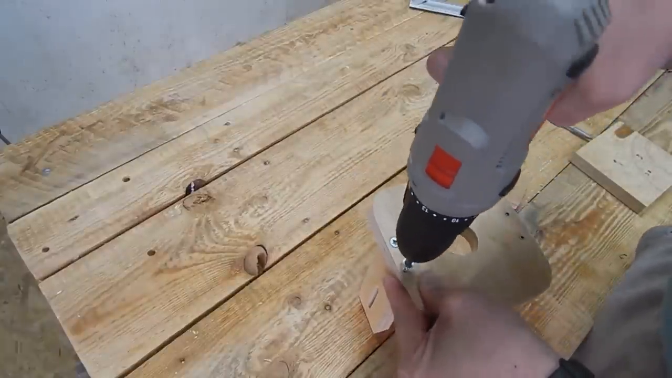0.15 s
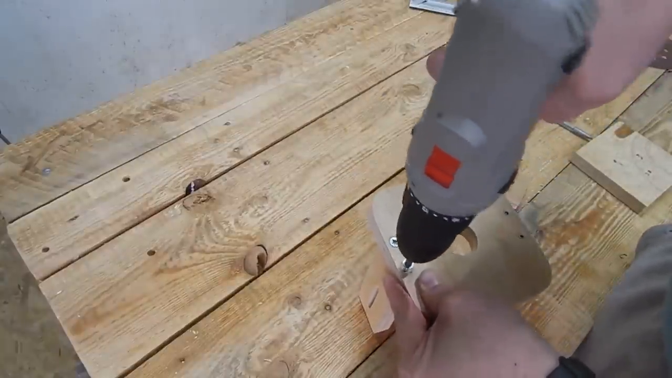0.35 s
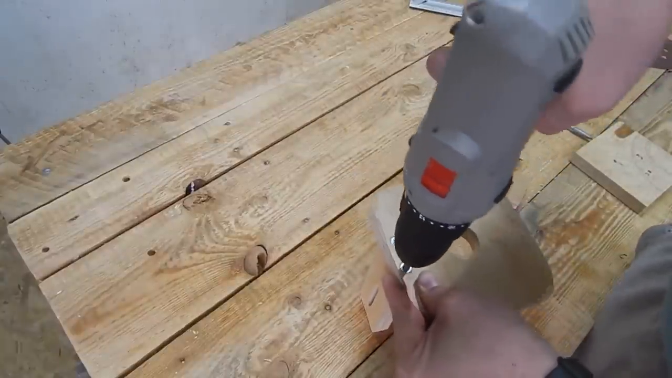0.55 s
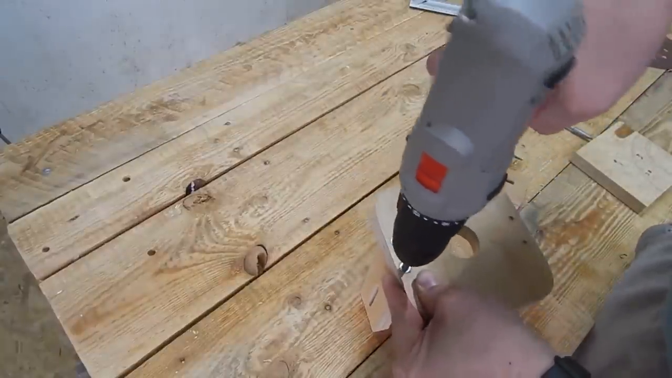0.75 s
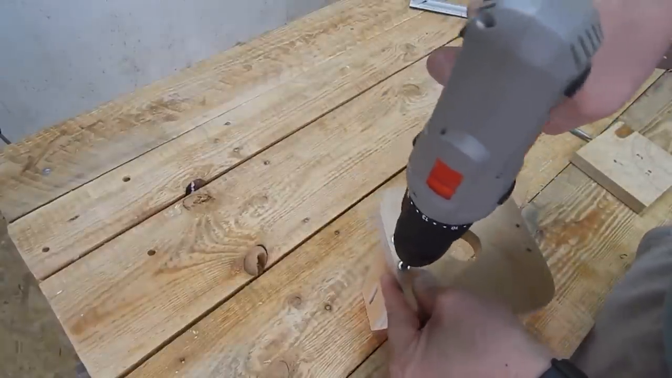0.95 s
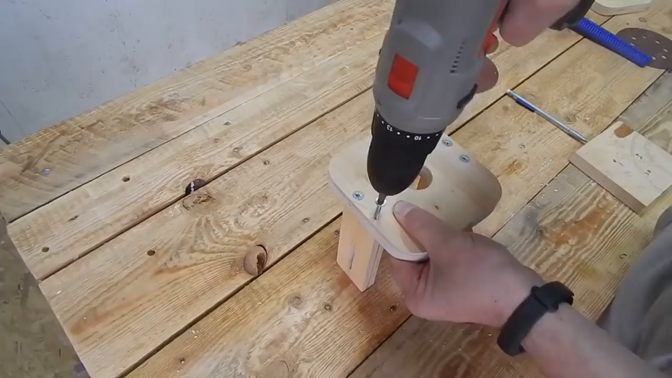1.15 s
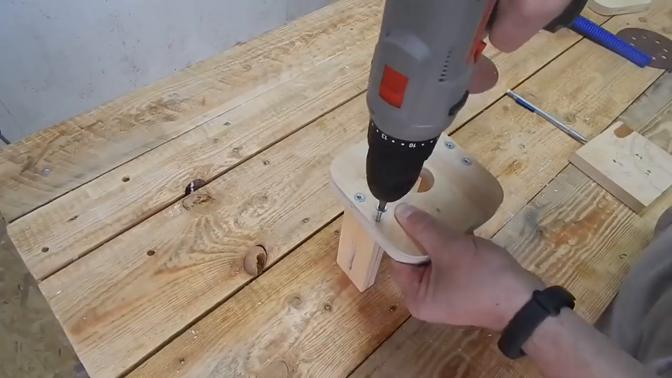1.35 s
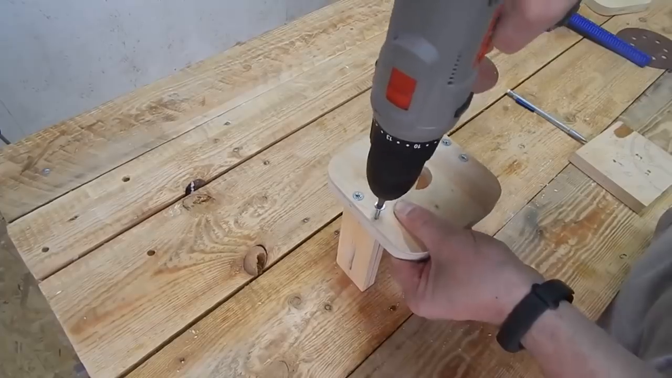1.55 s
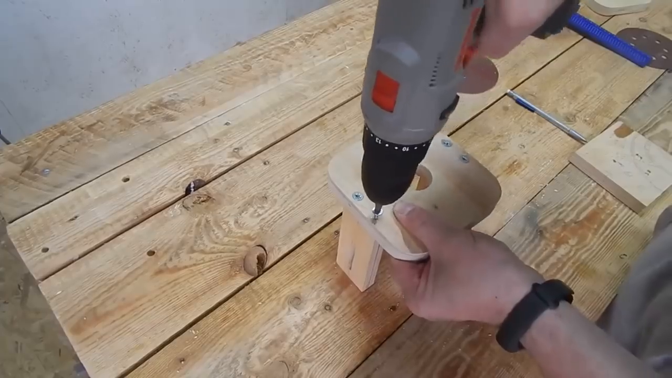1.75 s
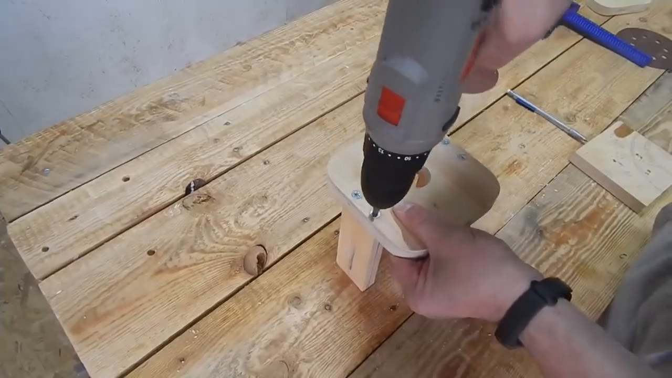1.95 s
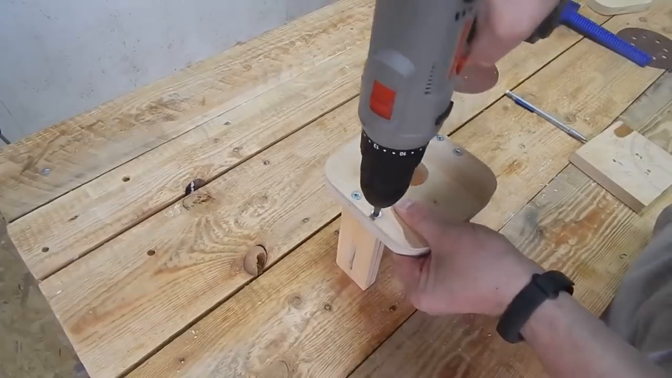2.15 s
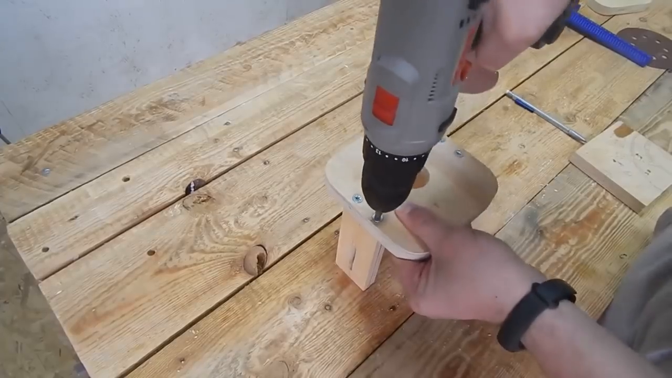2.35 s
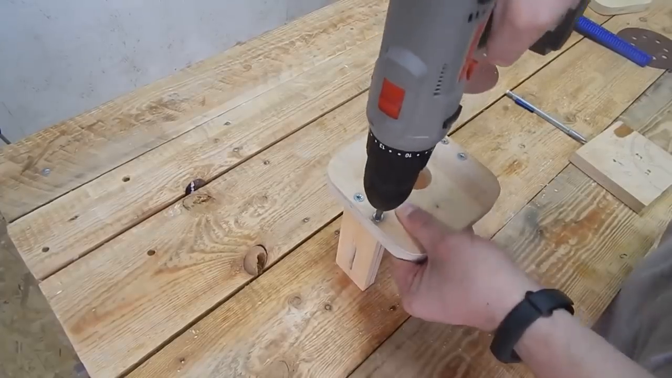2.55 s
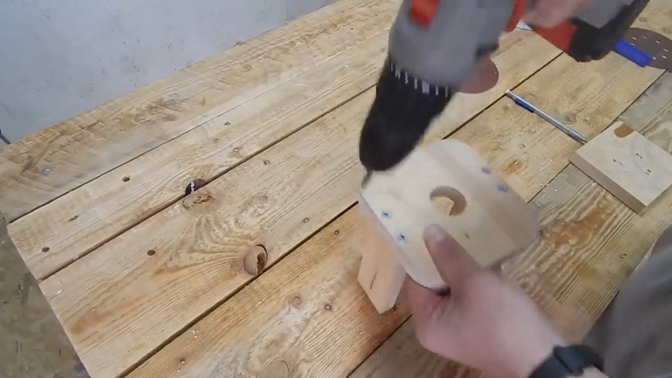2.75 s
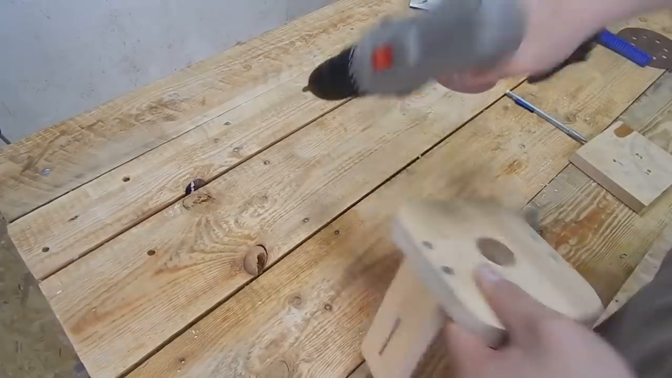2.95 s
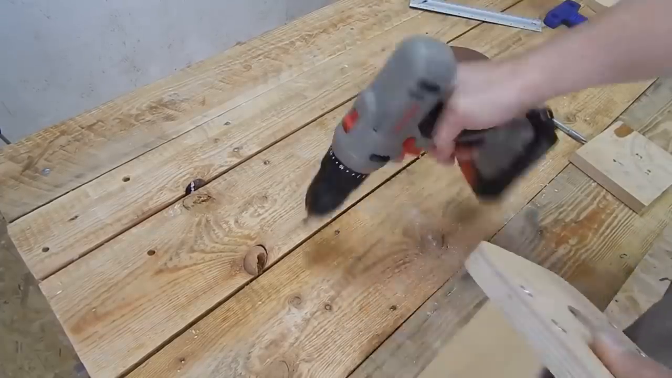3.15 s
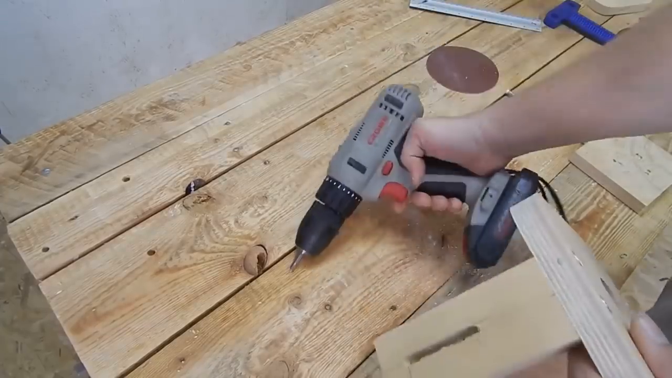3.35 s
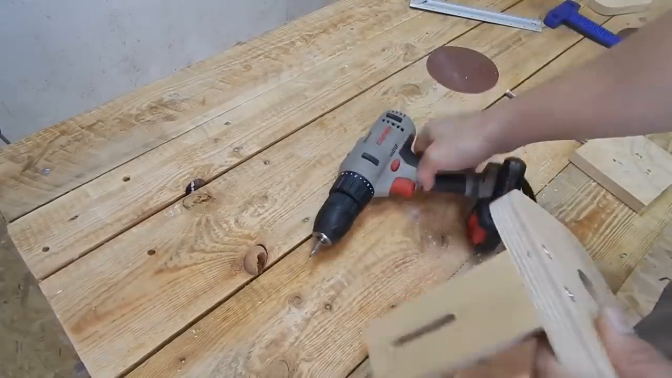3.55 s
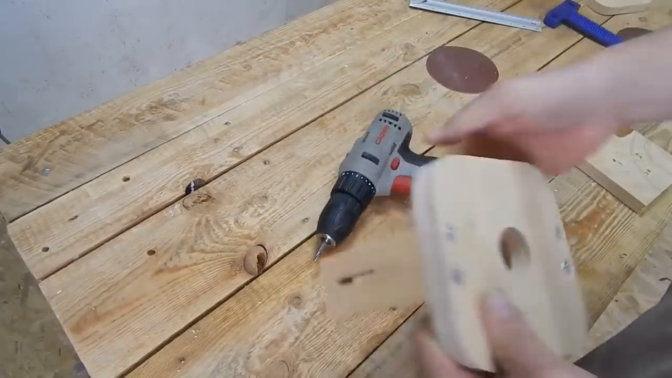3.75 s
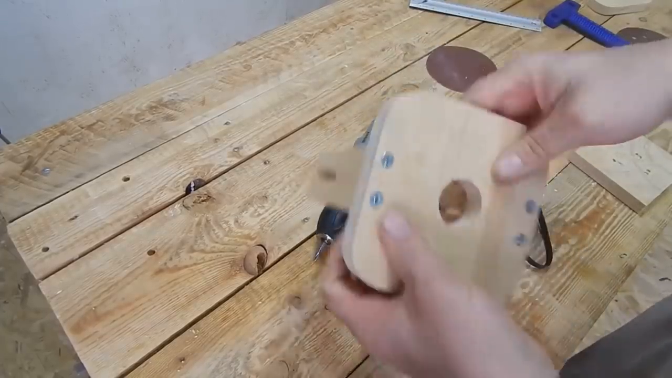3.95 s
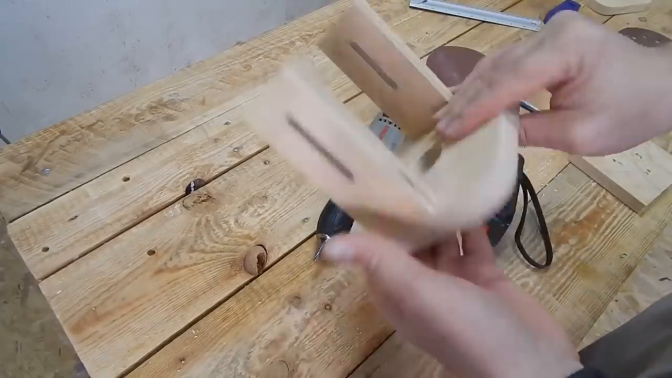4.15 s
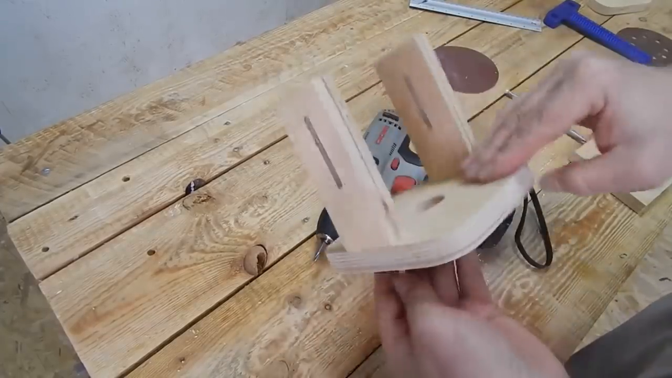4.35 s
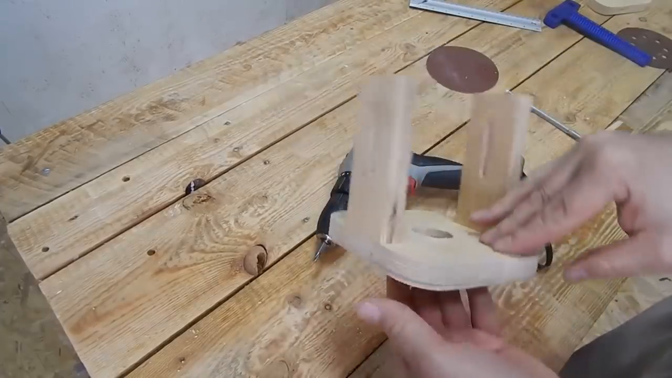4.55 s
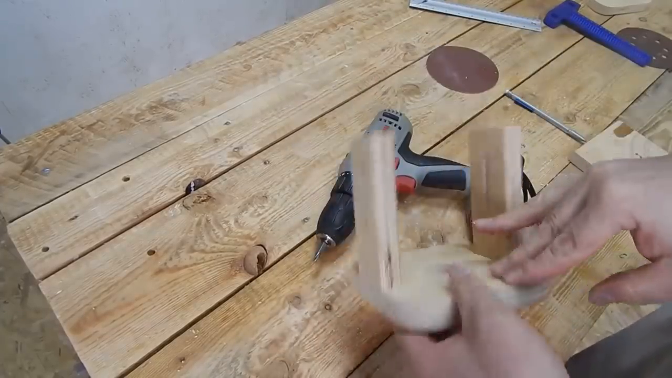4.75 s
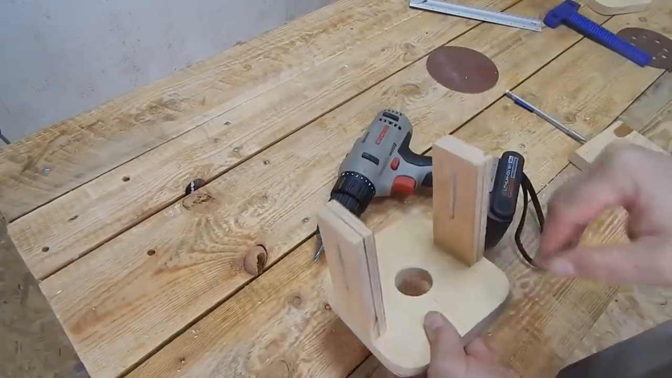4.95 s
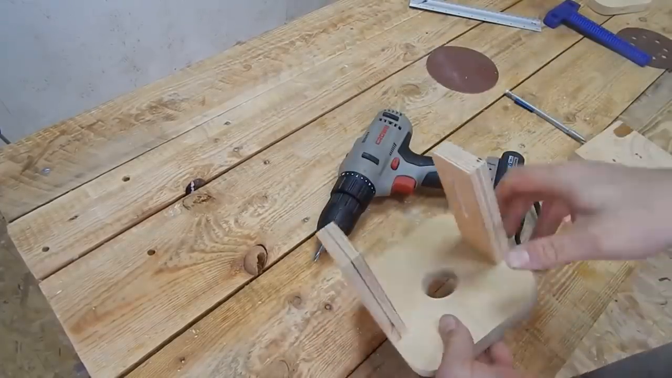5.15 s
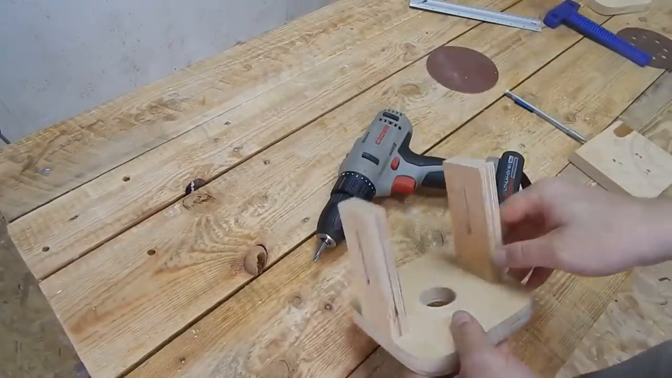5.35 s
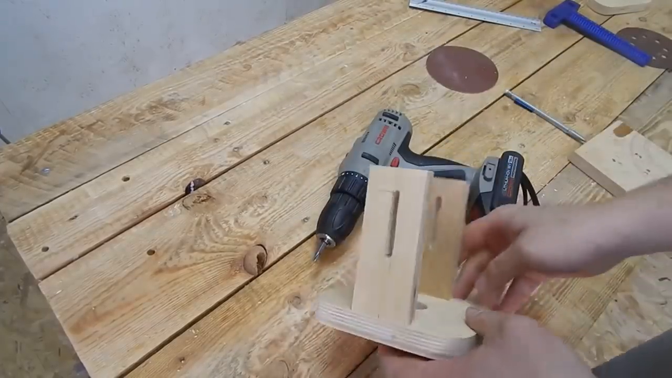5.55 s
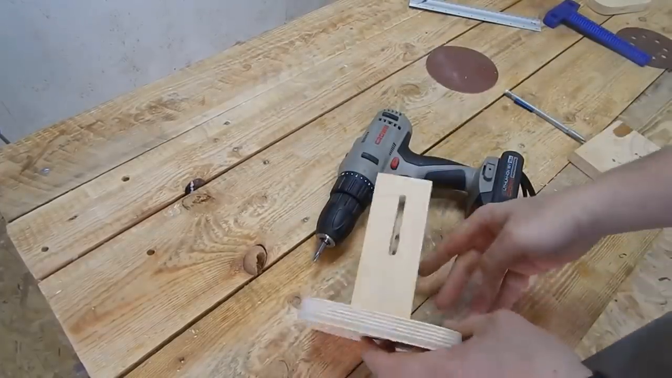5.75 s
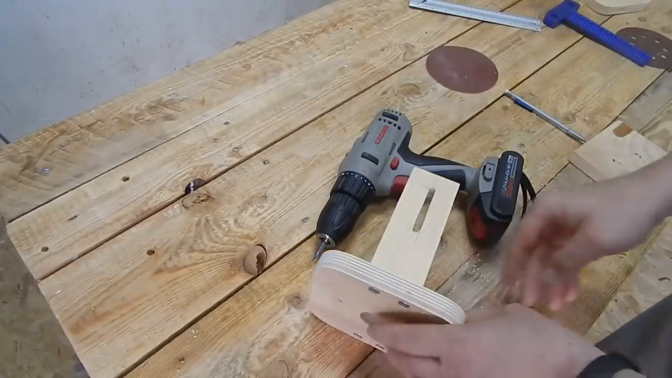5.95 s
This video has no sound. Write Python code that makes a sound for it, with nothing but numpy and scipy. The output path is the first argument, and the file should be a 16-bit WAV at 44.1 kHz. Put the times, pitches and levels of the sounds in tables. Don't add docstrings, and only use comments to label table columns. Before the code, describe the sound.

A cordless drill whines in four trigger squeezes, twice slipping into a racing buzz, then clatters onto a plank bench before hands rub and tap wood.

```python
import sys
import numpy as np
from scipy import signal
from scipy.fft import rfft, irfft
from scipy.io import wavfile
from scipy.ndimage import uniform_filter1d

SR = 44100
rng = np.random.default_rng(int(sys.argv[2]) if len(sys.argv) > 2 else 0)


def wrap_up_sound(samples):
    columns = np.atleast_2d(samples).T
    tamed = np.clip(columns, -1, 1)
    steps = np.round(tamed * 32767).astype(np.int16)
    wavfile.write(sys.argv[1], SR, steps)


def volts_from_decibels(level):
    exponent = np.asarray(level, float) / 20
    return 10 ** exponent


N = 265041

# (time [s], gear whine [Hz], motor effort [dB])
SQUEEZES = [
    [(0.0, 401.2, -52), (0.06, 491.1, -24), (0.116, 702.6, -20), (0.15, 785.5, -27.5), (0.186, 846.5, -21),
     (0.22, 869, -31), (0.25, 599, -44.5), (0.3, 392.3, -57)],
    [(0.37, 400.5, -45.5), (0.422, 467.7, -23.5), (0.455, 633.5, -24), (0.492, 767.4, -24),
     (0.552, 849.2, -22.5), (0.63, 860.4, -21), (0.665, 866.5, -33)],
    [(1.215, 425.8, -24.5), (1.272, 544.3, -24), (1.325, 789.5, -20), (1.351, 832.3, -28), (1.39, 700, -23),
     (1.425, 532.2, -24.5), (1.48, 400.6, -53.5), (1.52, 402.6, -49.5)],
    [(1.572, 402.5, -45.5), (1.624, 507.7, -22), (1.686, 795.2, -22.5), (1.724, 844.6, -26.5),
     (1.794, 900, -22.5), (1.984, 888.6, -20.5), (2.035, 879.5, -20.5), (2.05, 877, -37)],
]
# (time [s], shaft [Hz], motor effort [dB], bit pressure on the work [dB])
SLIPS = [
    [(0.66, 307.6, -31, -24.5), (0.705, 322.5, -32.5, -20), (0.77, 340.1, -31, -25),
     (0.866, 347.9, -30, -18), (0.92, 349.7, -32, -21.5), (0.962, 344.3, -34.5, -19.5),
     (0.98, 319.5, -37.5, -28.5), (1.03, 251.1, -64, -61)],
    [(2.05, 314.7, -33.5, -24), (2.088, 339.2, -28, -22.5), (2.15, 343.6, -31, -21),
     (2.185, 349.1, -32, -20.5), (2.226, 350.7, -27.5, -22), (2.33, 350, -29, -17.5),
     (2.352, 347, -33, -18), (2.375, 273.7, -36, -31.5), (2.42, 217.6, -58.5, -55)],
]
# (multiple of the whine [1], level [dB], roughness [0-1])
LOADED_ORDERS = [(1 / 3, 0.83, 0.19), (1 / 2, -2.2, 0.6), (2.01, -0.13, 0.44), (2.7, -7, 0.17),
                 (3.76, 1.3, 0.15), (3.2, -15, 0.4), (5.9, -8, 1)]
# (multiple of the shaft [1], level [dB], roughness [0-1])
FREE_ORDERS = [(1 / 2, -25.5, .1), (3 / 2, -11, 0.13), (5 / 2, -11, 0.066), (3, -13.5, .1),
               (7 / 2, -18.5, 0.22), (4, -17.5, 0.4), (9 / 2, -20, .15), (11 / 2, -13, .1),
               (13 / 2, -16, 0.1), (15 / 2, -21, .15), (8, -18, 0.17)]
# (frequency [Hz], density [dB per Hz])
HISS = [(1760, -6.5), (3000, 2.5), (3260, -30), (3720, 1), (5860, 1.5), (8180, -8), (12900, -10),
        (15100, -9.5), (15900, -26)]
# (frequency [Hz], width [Hz], level [dB])
GRIND = [(1190, 250, -10.5), (1473, 230, -2), (1927, 340, 4), (2250, 550, 3), (2598, 160, 5),
         (3336, 320, -2.5)]
# (frequency [Hz], width [Hz], level [dB])
RUMBLE = [(115, 22, -11.5), (152.5, 11, -1), (212, 9.7, -3), (322, 23, 6.5), (468, 28.5, 7),
          (562, 26, -2.5), (671, 58, 1.5), (880, 240, -4.5)]
# (frequency [Hz], width [Hz], level [dB])
BENCH = [(99, 67, -7), (112, 57, 1), (235, 35.5, -0.5), (311.3, 110, 5), (355, 120, 7.5), (441.5, 27, -5.5),
         (522.5, 65, -0.5), (633.3, 27, 4), (787, 59, 3), (1140, 215, 7.5), (1230, 410, 1.5),
         (1930, 170, -17.5)]
# (frequency [Hz], width [Hz], level [dB])
PLYWOOD = [(720, 45, 14.5), (780, 23, -4.5), (1043, 79, -0.5), (1256, 150, -1.5)]
# (time [s], peak [dB], contact [ms], struck plank [Hz])
BIT_JOLTS = [(0.229, -9.5, 0.098, 336), (0.279, -13.5, 0.47, 686), (0.658, -7, 0.19, 594.3),
             (0.966, -23.5, 0.17, 667), (1.555, -19.5, 0.69, 112.3), (0.331, -23.5, 0.79, 113),
             (2.048, -17, 0.62, 95), (2.041, -1, 0.22, 202), (2.055, 1, 0.074, 530),
             (2.076, -22, 0.12, 350), (2.358, -16, 0.13, 676)]
# (time [s], peak [dB], contact [ms], struck plank [Hz])
DRILL_DOWN = [(3.411, -10, 0.33, 163), (3.417, -16, 0.63, 90), (3.542, -7.5, 0.65, 96.5),
              (3.424, -10, 0.27, 390), (3.448, -10.5, 0.15, 224), (3.481, 0, 0.41, 325),
              (3.49, -18, 0.21, 244), (3.513, -12, 0.21, 352), (3.538, 4.5, 0.36, 284),
              (3.551, -1.5, 0.16, 270), (3.564, 2.5, 0.23, 315), (3.584, -2, 0.12, 267),
              (3.603, 1, 0.07, 443), (3.625, -4.5, 0.2, 448), (3.637, -3, 0.086, 300),
              (3.896, -25.5, 0.53, 130), (3.944, -24, 0.8, 338), (3.973, -26, 0.69, 355)]
# (time [s], peak [dB], contact [ms], struck plank [Hz])
PART_TAPS = [(2.745, -36.5, 0.46, 216), (2.765, -34, 0.12, 368), (2.826, -12, 0.15, 406),
             (2.836, -13, 0.11, 605), (5.813, -6.5, 0.27, 310), (5.8168, -0.5, 0.32, 328),
             (5.836, -8.5, 0.35, 328), (5.889, -12, 0.3, 325), (5.896, -5.5, 0.2, 795),
             (5.902, -2.5, 0.27, 306), (5.913, -4, 0.21, 303), (5.954, -6, 0.23, 618),
             (5.966, -6, 0.16, 803), (5.979, 0, 0.44, 343), (6, -9.5, 0.17, 445)]
# (time [s], peak [dB], centre [Hz])
TICKS = [(2.8418, -44, 2720), (3.4155, -23.5, 2030), (3.5398, -23, 2760), (3.8235, -36, 2020),
         (4.0814, -43, 2070), (4.1835, -40, 2040), (4.4253, -34, 3800), (4.91, -45, 3240),
         (5.828, -44, 2080), (5.9577, -29.5, 1990)]
# (time [s], length [s], dull rub [dB], bright rub [dB])
STROKES = [(3.744, 0.49, -58.5, -60.5), (3.818, 0.017, -49.5, -51.5), (4.055, 0.024, -55, -65),
           (4.149, 0.014, -51, -61.5), (4.305, 0.077, -116, -50), (4.399, 0.055, -47, -54),
           (4.46, .3, -65, -65.5), (4.812, .2, -59.5, -62.5), (5.055, .25, -80, -80.5),
           (5.302, 0.15, -43, -52.5), (5.5, 0.55, -57, -60)]
RATTLE_STARTS_S = 3.415, 3.44, 3.541, 5.826, 5.893, 5.955
# (length [s], dull [dB], bright [dB])
RATTLES = [(0.0058, -33, -53.5), (0.062, -39, -49.5), (0.051, -21.5, -41.5), (.02, -37, -56),
           (0.044, -46, -60), (0.023, -36.5, -59.5)]
# (frequency [Hz], t60 [s], level [dB])
ROOM = [(60, 1, -13), (298, 0.37, 2), (700, 0.55, 1), (1490, 0.65, -1.5), (2840, 0.29, -5),
        (8000, 0.25, -2.5), (16000, 0.28, -0.5)]
# (frequency [Hz], likeness [0-1])
LIKENESS = [(100, 0.94), (500, 0.97), (1500, 0.7), (4000, 0.08), (12000, 0)]
# (frequency [Hz], density [dB per Hz])
SHOP = [(15, -36), (25, -6.5), (64, 5.5), (300, -7.5), (414, -0.5), (528, -11.5), (674, -10), (1100, -16.5),
        (3310, -18), (4220, -24), (8760, -33.5), (13500, -20.5), (15900, -36)]
# (time [s], gain [dB])
DUCK = [(0, 4.5), (2.4, -17), (2.62, -17.5), (2.9, -3.5), (3.4, -3.5), (3.7, -1.5), (4.2, -0.5), (6.01, -1)]
# (frequency [Hz], width [Hz])
NOTCHES = [(2995, 50), (9000, 80)]

# (brush hiss [dB], gear grind [dB], bench rumble [dB], fan hiss [dB])
LOADED_DB, FREE_DB = (0, -3, -11, -3), (0, 2, -6.5, 1.5)
SLOW_DB = (-1, 3.5, 14, -7.5)
FULL_HZ, FULL_DB, RUMBLE_SHARE = 940, -21, 0.27
WHINE_DB, TOOTH_DB, SHAFT_DB = -6.5, -2.5, 2
WHINE_SLOW_DB, TOOTH_SLOW_DB, SHAFT_SLOW_DB = 9, -24, -160
STAGE_RATIO, STAGE_HZ, STAGE_WIDTH_HZ, STAGE_DB = 1.7, 1051, 131, 3
ONE_DB, TWO_DB, REST_DB = 2.5, 5.5, 0.5
WOBBLE_S, WOBBLE_DEPTH, WOBBLE_DIPS_S = 0.094, 0.85, (0.664, 2.068)
CRACK_DB, PLANK_DB = (-19.5, -26.5, -30), (7, 7.5, 12)
PLY_DB, PLY_DB_PER_MS = -13, -43
SPOT_DB, BLOW_DELAY_S = 3, 0.003
STROKE_ATTACK, STROKE_FADE_S = 0.15, 0.02
LEAD = 300
ROOM_DB, NEAR_DB, LEFT_DB = -6, -0.05, -2
SHOP_DB, SHOP_BASS_DB, SHOP_TREBLE_DB, TREBLE_LAG = -50, 0, 1.5, 1.3
HUM_HZ, HUM_DB, HUM_S = 678, -59, (1.4, 3.6)
TOP_HZ = 15900


def drill():
    load_tones, load_hz = loaded_motor()
    free_tones, free_hz = racing_motor()
    beat = np.cos(2 * np.pi * np.cumsum(load_hz + free_hz) / SR)

    hiss = coloured(HISS) * (1 + 0.5 * beat) * volts_from_decibels(1.2 * walk(60))
    brush, fan = map(unit, split(hiss, 8700))
    grind = unit(ring(rng.standard_normal(N) * volts_from_decibels(1.3 * walk(320)), GRIND)) * (1 + 0.18 * beat)
    rumble = unit(ring(rng.standard_normal(N) * volts_from_decibels(1.95 * walk(61)), RUMBLE))

    noise = np.zeros(N)
    for tables, layer_db, slow_db in ((SQUEEZES, LOADED_DB, SLOW_DB), (SLIPS, FREE_DB, np.zeros(4))):
        gate, _, hz, db = curves(tables)[:4]
        slow = 1 - hz / FULL_HZ
        efforts = db, db, FULL_DB + RUMBLE_SHARE * (db - FULL_DB), db
        for layer, effort, above, gain in zip((brush, grind, rumble, fan), efforts, layer_db, slow_db):
            noise += gate * volts_from_decibels(effort + above + gain * slow) * layer
    return load_tones + free_tones, noise


def loaded_motor():
    gate, _, hz, db = curves(SQUEEZES)
    slow = 1 - hz / FULL_HZ
    shaft_db = SHAFT_DB + SHAFT_SLOW_DB * slow
    tooth_db = TOOTH_DB + TOOTH_SLOW_DB * slow
    tones = volts_from_decibels(WHINE_DB + WHINE_SLOW_DB * slow) * (volts_from_decibels(1.7 * walk(30)) * line(hz, 0.56) + sum(
        volts_from_decibels(level + (shaft_db if k < 1 else tooth_db)) * line(k * hz, rough)
        for k, level, rough in LOADED_ORDERS))
    stage_hz = STAGE_RATIO * hz
    stage = line(stage_hz, 0.17) + volts_from_decibels(-6.5) * line(2 * stage_hz, 1.36)
    stage *= np.exp(-((stage_hz - STAGE_HZ) / STAGE_WIDTH_HZ) ** 2)
    return gate * volts_from_decibels(db) * (tones + volts_from_decibels(STAGE_DB) * stage), gate * hz / 3


def racing_motor():
    gate, _, hz, _, press_db = curves(SLIPS)
    t = np.arange(N) / SR
    turn = (t - np.where(t < SLIPS[1][0][0], *WOBBLE_DIPS_S)) / WOBBLE_S
    wobble = 1 - WOBBLE_DEPTH * np.cos(np.pi * turn) ** 6
    slip = 0.48 * walk(15.5)
    buzz = volts_from_decibels(ONE_DB) * line(hz, 0.08, slip)
    buzz += volts_from_decibels(TWO_DB) * wobble * line(2 * hz, 0.09, 2 * slip)
    rest = sum(volts_from_decibels(level) * line(k * hz, rough, k * slip) for k, level, rough in FREE_ORDERS)
    return gate * volts_from_decibels(press_db) * (buzz + volts_from_decibels(REST_DB) * rest), gate * hz


def knocks():
    out, t = np.zeros(N + SR), np.arange(SR // 4) / SR
    for blows, crack_db, plank_db in zip((BIT_JOLTS, DRILL_DOWN, PART_TAPS), CRACK_DB, PLANK_DB):
        spots = rng.standard_normal((len(blows), len(BENCH)))
        for (s, db, ms, plank_hz), spot in zip(blows, spots):
            push = t ** 2 * np.exp(-t / (max(ms, 0.05) / 1000))
            modes = [(hz * (1 + 0.083 * c), 0.85 * width, level + SPOT_DB * c)
                     for (hz, width, level), c in zip(BENCH, spot)]
            body = ring(push, modes) + volts_from_decibels(plank_db) * ring(push, [(plank_hz, 0.17 * plank_hz, 0.1)])
            burst = rng.standard_normal(len(t)) * np.exp(-t / 0.0067)
            crack = ring(burst, [(2060, 1300, -18.0), (3510, 2100, -24.5)])
            ply = ring(push, [(hz * (1 + 0.019 * c), w, level) for (hz, w, level), c in zip(PLYWOOD, spot)])
            blow = peak_one(body) + volts_from_decibels(PLY_DB + PLY_DB_PER_MS * ms) * peak_one(ply)
            blow += volts_from_decibels(crack_db) * peak_one(crack)
            out[int((s + BLOW_DELAY_S) * SR):][:len(t)] += volts_from_decibels(db - 5.5) * blow
    for s, db, hz in TICKS:
        tick = ring(rng.standard_normal(len(t)) * np.exp(-t / 0.002), [(hz, 0.22 * hz, 0.1)])
        out[int(s * SR):][:len(t)] += volts_from_decibels(db) * peak_one(tick)
    return out[:N]


def hands():
    t, out = np.arange(N) / SR, np.zeros(N)
    grain = rng.standard_normal(N) * volts_from_decibels(1.5 * walk(400) + 0.79 * walk(21))
    dull = unit(ring(grain, [(1284, 1360, 0.38), (2970, 1120, 0.82)]))
    bright = unit(ring(ring(grain, [(9600, 22000, 0.1)]), [(10500, 16200, 0.1)]))
    rattles = [(s, *row) for s, row in zip(RATTLE_STARTS_S, RATTLES)]
    for s, length, dull_db, bright_db in STROKES + rattles:
        attack = np.clip((t - s) / (STROKE_ATTACK * length), 0, 1)
        fade = np.exp(-np.maximum(t - s - length, 0) / STROKE_FADE_S)
        out += attack * fade * (volts_from_decibels(dull_db - 5.5) * dull + volts_from_decibels(bright_db) * bright)
    return out


def near():
    direct = signal.unit_impulse(SR, LEAD)
    smear = direct
    for lag in (37, 113, 241, 389):
        taps = signal.unit_impulse(lag + 1, lag) - 0.27 * signal.unit_impulse(lag + 1)
        smear = signal.lfilter(taps, taps[::-1], smear)
    return pair(direct, smear) * (np.arange(SR) < SR // 2)


def tail():
    t, out = np.arange(SR) / SR, np.zeros((2, SR))
    for hz in 40 * 2 ** np.arange(0, 8.8, 1 / 2):
        band = signal.lfilter(*signal.iirpeak(hz, 5 / 2, SR), rng.standard_normal((2, SR)))
        decay = np.exp(-np.log(1000) * t / over_hz(ROOM, hz))
        out += volts_from_decibels(over_hz(ROOM, hz, column=2)) * band * decay
    echo = pair(*out) * np.clip((t - LEAD / SR) / 0.0014, 0, 1)
    return echo / np.sqrt(np.sum(echo ** 2) / 2)


def shop():
    _, t, duck_db = curves([DUCK])
    low, treble = split(pair(coloured(SHOP), coloured(SHOP)), 4000)
    bass, middle = split(low, 170)
    tone = volts_from_decibels(SHOP_BASS_DB) * bass + middle + volts_from_decibels(SHOP_TREBLE_DB + TREBLE_LAG * duck_db) * treble
    hum = (t > HUM_S[0]) * (t < HUM_S[1]) * line(np.full(N, HUM_HZ), 0.18)
    flicker_db = 1.5 * walk(17)
    return volts_from_decibels(SHOP_DB + duck_db + flicker_db) * tone + volts_from_decibels(HUM_DB + duck_db) * hum


def line(hz, rough, slip=0):
    phase = 2 * np.pi * np.cumsum(hz) / SR + slip + 2.22 * rough * walk(65)
    return np.sqrt(2) * np.cos(phase) * volts_from_decibels(5.2 * rough * walk(35))


def ring(x, peaks):
    return sum((-1) ** k * volts_from_decibels(db) * signal.lfilter(*signal.iirpeak(hz, hz / width, SR), x)
               for k, (hz, width, db) in enumerate(peaks))


def coloured(spectrum):
    gain = volts_from_decibels(over_hz(spectrum, np.fft.rfftfreq(N, 1 / SR)))
    return unit(irfft(rfft(rng.standard_normal(N)) * gain, N))


def walk(rate):
    k = int(SR / rate)
    return unit(uniform_filter1d(uniform_filter1d(rng.standard_normal(N), k), k))


def pair(mid, side):
    like = np.clip(over_hz(LIKENESS, np.fft.rfftfreq(len(mid), 1 / SR)), 0, 1)
    m = rfft(mid) * np.sqrt((1 + like) / 2)
    s = rfft(side) * np.sqrt((1 - like) / 2)
    return irfft(np.array([m + s, m - s]), len(mid))


def split(x, hz):
    low = signal.sosfiltfilt(signal.butter(3, hz, fs=SR, output="sos"), x)
    return low, x - low


def curves(tables):
    t = np.arange(N) / SR
    starts = np.array([rows[0][0] for rows in tables])
    is_open = sum(1.0 * ((t > rows[0][0]) & (t < rows[-1][0])) for rows in tables)
    gate = uniform_filter1d(is_open, size=200)
    since = t - starts[np.maximum(np.searchsorted(starts, t) - 1, 0)]
    s, *columns = np.concatenate(tables).T
    return gate, since, *(np.interp(t, s, c) for c in columns)


def over_hz(table, hz, column=1):
    table = np.transpose(table)
    return np.interp(np.log(hz + 1), np.log(table[0]), table[column])


def unit(x):
    return x / np.sqrt(np.mean(x ** 2))


def peak_one(x):
    return x / abs(x).max()


def scene():
    lines, noise = drill()
    room, direct = volts_from_decibels(ROOM_DB) * tail(), volts_from_decibels(NEAR_DB) * near()
    wet = signal.fftconvolve((noise + knocks() + hands())[None], room + direct, axes=1)
    wet += signal.fftconvolve(lines[None], volts_from_decibels(-12) * room + direct, axes=1)
    return (wet[:, LEAD:N + LEAD] + shop()) * volts_from_decibels([[LEFT_DB / 2], [-LEFT_DB / 2]])


def low_pass(x):
    return signal.sosfilt(signal.butter(12, 16010, fs=SR, output="sos"), x)


def record(dry):
    for hz, width in NOTCHES:
        dry = signal.lfilter(*signal.iirnotch(hz, hz / width, SR), dry)
    dry = signal.sosfilt(signal.ellip(8, 0.2, 70, TOP_HZ, fs=SR, output="sos"), dry)
    return low_pass(dry)


dry = scene()
out = record(dry)
wrap_up_sound(out)
```